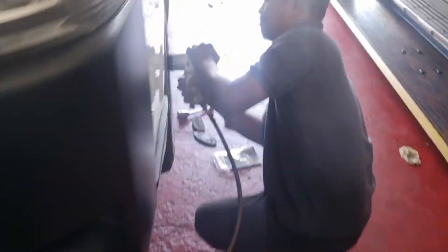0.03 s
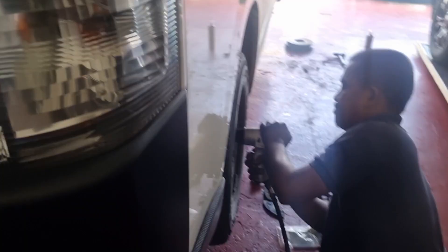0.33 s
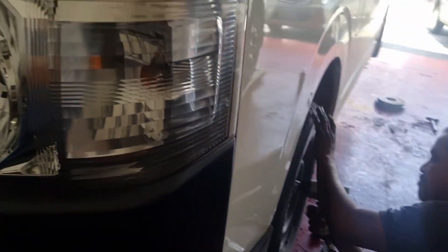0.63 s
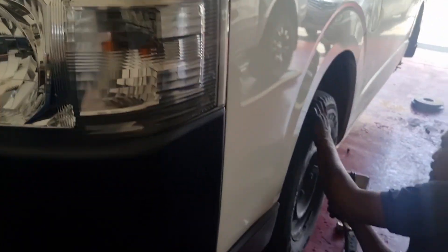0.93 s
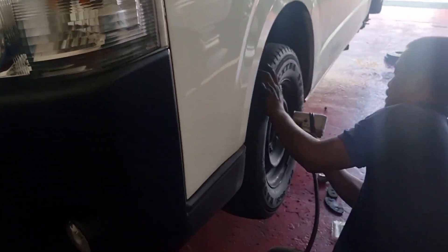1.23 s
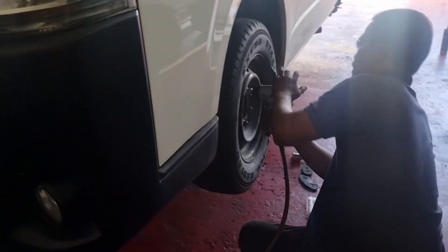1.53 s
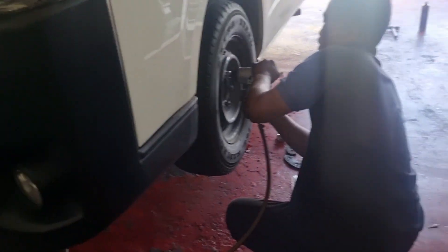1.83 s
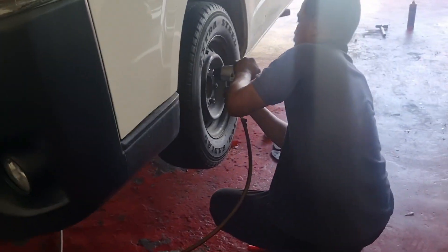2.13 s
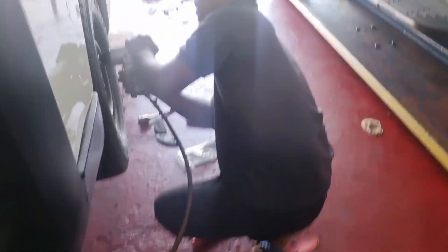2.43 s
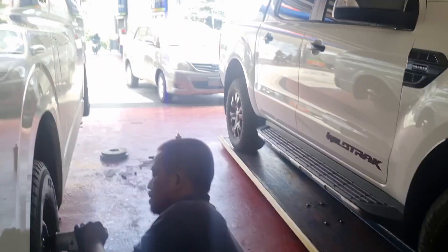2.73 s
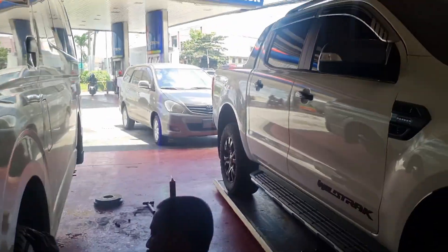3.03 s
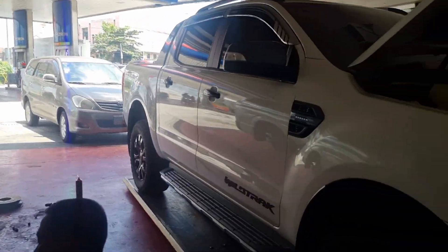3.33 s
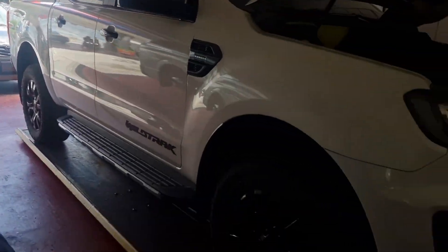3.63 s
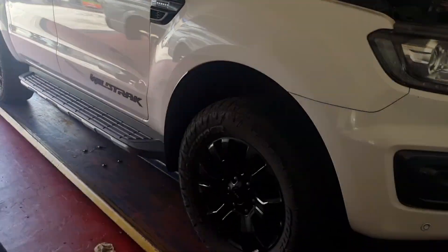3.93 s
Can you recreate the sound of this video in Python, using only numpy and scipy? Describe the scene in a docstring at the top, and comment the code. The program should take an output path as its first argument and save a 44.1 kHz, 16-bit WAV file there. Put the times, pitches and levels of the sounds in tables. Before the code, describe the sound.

An air impact wrench rattles and hisses in three bursts in an echoing garage.

```python
"""An air impact wrench runs three times on the wheel nuts of a van in an open, echoing garage.
Its hammer strikes about sixteen times a second and rings socket and wheel; the exhaust air hisses
and whistles, the motor drones. Between bursts the socket clanks onto the next nut.
Traffic and an idling engine rumble outside."""
import sys
import numpy as np
from scipy import signal
from scipy.fft import rfft, irfft
from scipy.io import wavfile
from scipy.ndimage import uniform_filter1d, map_coordinates

SR = 44100
rng = np.random.default_rng(int(sys.argv[2]) if len(sys.argv) > 2 else 0)


def wav_record(signal):
    """Record a signal, one row per channel, as 16-bit PCM in the file named by sys.argv[1]."""
    frames = np.transpose(np.atleast_2d(signal))
    bounded = np.clip(frames, -1, 1)
    # unit amplitude maps onto the largest positive 16-bit level
    quanta = np.round(bounded * 32767).astype(np.int16)
    wavfile.write(sys.argv[1], SR, quanta)


N = 176400
TIME_S = np.arange(N) / SR

# trigger held: start_s, stop_s, air_gain_db, mid_gain_db, high_whistle_gain_db, motor_hz, drone_db
BURSTS = [(-.5, .468, 1, -2.5, -12, 175.2, -31), (1.416, 2.825, -1.5, -0.16, 3, 184.7, -30),
          (3.454, 4.2, 0.5, 1.6, 12.5, 186, -25.5)]
# hammer blows: time_s, level_db
BLOWS = [(0.0395, 4.5), (0.1035, -3), (0.1646, 4.5), (0.227, 2.5), (0.2877, 2), (0.348, 2), (.403, 4.5),
         (.46, 0), (0.5502, -2), (1.481, 8), (1.5176, 2.5), (1.5806, 1), (1.6406, 1), (1.7029, 1.5),
         (1.7664, 1.5), (1.825, 0.5), (1.8896, 0.5), (1.9533, 0.5), (2.0177, 2), (2.0812, 3.5), (2.1458, 4),
         (2.2042, 2.5), (2.2712, 1.5), (2.3294, -11), (2.365, 2.5), (2.4362, 2.5), (2.5053, 2),
         (2.562, 1.5), (2.6741, 2), (2.7808, 2), (2.8214, -3), (3.521, 3), (3.5752, 0.5), (3.6348, -0.5),
         (3.6939, -4), (3.7514, -1.5), (3.8108, -0.5), (3.8652, 0), (3.938, -2.5)]
SPIN_UP_S, STALL_S, PRESSURE_DECAY_S = 0.025, 0.0176, 0.022


def hammer(crack_db=-16.5, crack_s=0.0015, clatter_db=-24, clatter_s=0.019, ring_db=5):
    """Each blow cracks, clatters and rings wheel, socket and nut, a little differently each time."""
    # contact spectrum: freq_hz, gain_db
    spectrum = [(150, -13), (720, -0.5), (1200, 3), (1550, 2), (2400, 1.5), (5200, -0.5), (8000, -2),
                (10000, -7.5), (15000, -8.5)]
    # wheel, socket and nut modes: freq_hz, gain_db, t60_s
    modes = [(344, -31, 0.055), (853, -15, 0.0034), (1223, -15, 0.013), (1334, -27.5, 0.095),
             (2300, -12, 0.0034)]
    # how freely the socket rings: time_s, gain_db
    ring_gain = [(.2, -11), (1.5, -7.5), (1.6, 2), (2.2, -3.5), (2.4, -1.5), (2.8, -3.5), (3.55, -8.5),
                 (4, -2)]
    time_s, level_db = np.transpose(BLOWS)
    hits = clicks(time_s, level_db)
    contact = from_db(crack_db) * fade(hits, crack_s) + from_db(clatter_db) * fade(hits, clatter_s)
    ringing = 0
    for k, (freq_hz, gain_db, t60_s) in enumerate(modes):
        strikes = clicks(time_s, level_db + gain_db + rng.normal(0, 1, len(time_s)))
        ringing += (-1) ** k * ring(strikes, freq_hz, t60_s)
    ringing *= from_db(ring_db + curve(ring_gain))
    return colour(contact * rng.standard_normal(N), spectrum) + ringing


def exhaust(level_db=-21.5, dip_db=-0.5, flutter_db=1.37, fill_s=0.022):
    """Fluttering air from the motor: starts thin, fills in, dips slightly at each blow."""
    # hiss spectrum: freq_hz, gain_db
    spectrum = [(60, -9), (125, 0.5), (205, 1), (265, -3), (340, -0.5), (660, -4), (1250, -5.5),
                (1520, -6.5), (2000, -4), (2800, -1.5), (3500, -3.5), (6200, -4.5), (7200, 1), (8500, -7.5),
                (9700, -9), (12500, -5.5), (16000, -5.5)]
    # hiss treble: time_s, gain_db
    treble_gain = [(0, -3.5), (1.5, 3), (2.2, -3), (2.4, 1), (2.8, -0.5), (3.5, -0.5), (4, -3.5)]
    # resonance pulsing with the blows: time_s, level_db
    shrill_level = [(.1, -28), (.44, -26), (.7, -33), (2.7, -45), (4, -30)]
    # resonance in the hiss: time_s, level_db
    bright_level = [(2.2, -50), (2.7, -39.5), (3.5, -49)]
    flow = from_db(dip_db * after_blows(STALL_S) + flutter_db * drift(78))
    hiss = from_db(level_db) * colour(rng.standard_normal(N) * flow, spectrum)
    mids = signal.sosfilt(signal.butter(1, [280, 3500], "band", fs=SR, output="sos"), hiss)
    treble = signal.sosfilt(signal.butter(1, 7000, "high", fs=SR, output="sos"), hiss)
    hiss += (from_db(curve(treble_gain)) - 1) * treble
    shrill = unit_rms(ring(rng.standard_normal(N), freq_hz=3040, t60_s=0.0053))
    shrill *= from_db(curve(shrill_level)) * after_blows(PRESSURE_DECAY_S)
    bright = from_db(curve(bright_level)) * unit_rms(ring(treble, freq_hz=5080, t60_s=0.0019))
    out = 0
    for start_s, stop_s, air_gain_db, mid_gain_db, *_ in BURSTS:
        filled = 1 - np.exp(-np.maximum(TIME_S - start_s, 0) / fill_s)
        air = from_db(air_gain_db) * (hiss + (filled * from_db(mid_gain_db) - 1) * mids)
        out += valve(start_s, stop_s) * (air + shrill + bright)
    return out


def whistles(flip_pressure=0.55, surge_db=0.5):
    """Pressure rises at each blow: the low whistle flips between two notes, the high one jumps and sinks."""
    # exhaust whistles, low then high: pitch_hz, jump_hz, wander_hz, width_hz, base_db
    voices = [(7070, 610, 70, 82, -30.5), (13400, 1300, 57, 48, -42.5)]
    # low whistle: time_s, gain_db
    low_gain = [(.07, 4), (.3, -9), (1.7, 5.5), (1.95, -2.5), (2.6, -8), (4, -4.5)]
    pressure, tones = after_blows(PRESSURE_DECAY_S), []
    flipped = pressure + 0.2 * drift(20) > flip_pressure
    for rise, (pitch_hz, jump_hz, wander_hz, width_hz, base_db) in zip((flipped, pressure), voices):
        phase = phase_of(pitch_hz + jump_hz * rise + wander_hz * drift(12.2))
        gain = from_db(base_db + surge_db * pressure + 2 * drift(11))
        narrow_noise = drift(width_hz) * np.sin(phase) + drift(width_hz) * np.cos(phase)
        tones.append(gain * unit_rms(narrow_noise))
    low, high = tones
    low *= from_db(curve(low_gain))
    return sum(valve(start_s + SPIN_UP_S, stop_s) * (low + from_db(high_gain_db) * high)
               for start_s, stop_s, _, _, high_gain_db, _, _ in BURSTS)


def motor(sag=0.08, wander=0.03478):
    """The rotor drones at twice and three times its speed; each blow slows it briefly."""
    stall, out = after_blows(STALL_S), 0
    speed = 1 - sag * (stall - stall.mean()) + wander * drift(41.8)
    for start_s, stop_s, *_, motor_hz, drone_db in BURSTS:
        phase = phase_of(motor_hz * speed)
        drone = sum(from_db(gain_db + 2 * drift(26)) * np.sin(order * phase)
                    for order, gain_db in ((2, -4), (3, -8.5)))
        out += valve(start_s + SPIN_UP_S, stop_s) * from_db(drone_db) * unit_rms(drone)
    return out


def valve(start_s, stop_s, open_s=0.0082, close_s=0.022):
    """Trigger valve opening, 0 to 1."""
    return np.clip((TIME_S - start_s) / open_s, 0, 1) * np.clip(1 - (TIME_S - stop_s) / close_s, 0, 1)


def after_blows(decay_s):
    """1 at each blow, sinking towards 0."""
    return np.minimum(fade(clicks(np.transpose(BLOWS)[0], 0), decay_s), 1)


def socket(knock_db=-28, knock_s=0.0042, slide_db=-30.5, slide_s=0.051):
    """The socket knocks against the nut, then scrapes on."""
    # socket meets nut: time_s, level_db
    clanks = [(1.069, -5.5), (1.351, -8), (3.2317, -0.5), (3.3194, -11.5)]
    # clank spectrum: freq_hz, gain_db
    spectrum = [(100, 3), (350, 10), (700, 1), (1600, 0.5), (2900, 3.5), (5500, -10), (7300, -2.5),
                (9000, -17), (15000, -16)]
    hits = clicks(*np.transpose(clanks))
    knock = from_db(knock_db) * fade(hits, knock_s)
    slide = from_db(slide_db + drift(90)) * fade(hits, slide_s)
    return colour((knock + slide) * rng.standard_normal(N), spectrum)


def garage(direct, into_hall, direct_db=-4, spots=20):
    """Direct sound on two spaced microphones, plus echoes that change as the listener walks about."""
    # direct sound at the right microphone: time_s, lag_ms
    right_lag = [(0, 0.13), (2.7, 0.322), (3.6, 0.54)]
    lead = SR // 3
    running = np.r_[into_hall[:lead][::-1], into_hall]  # the hall starts full of sound
    position, echoes = np.linspace(0, spots - 1, len(running)), 0
    noise = np.hstack([diffuse() for _ in range(spots * SR // N + 1)])
    for k in range(spots):
        nearness = np.sqrt(np.clip(1 - abs(position - k), 0, 1))
        response = reflections(noise[:, k * SR:(k + 1) * SR])
        echoes += signal.fftconvolve([running * nearness], response, axes=1)[:, lead:lead + N]
    right = map_coordinates(direct, [np.arange(N) - curve(right_lag) * SR / 1000], order=3)
    return from_db(direct_db) * np.array([direct, right]) + echoes


def reflections(noise, early_db=4, early_s=0.0035, tail_db=1.5):
    """Response at one spot: quick echoes off van and floor, then the hall's tail."""
    # hall decay: freq_hz, t60_s
    bands = [(100, 0.72), (500, 1.09), (2500, 0.88), (7000, 0.82), (10000, 0.57)]
    freq_hz, time_s = np.fft.rfftfreq(SR, 1 / SR), TIME_S[:SR]
    spectrum, response = rfft(noise), 0
    early = from_db(early_db) * unit_rms(np.exp(-time_s / early_s))
    for band_hz, t60_s in bands:
        share = at_hz([(hz, hz == band_hz) for hz, _ in bands], freq_hz)
        tail = from_db(tail_db) * unit_rms(np.exp(-np.log(1000) * time_s / t60_s))
        response += irfft(spectrum * share, SR) * np.hypot(tail, early)
    return flatten(response) / np.sqrt(SR)


def flatten(response, smooth_hz=24, length_s=0.8):
    """Echoes from many surfaces add up to an even colour."""
    spectrum = rfft(response)
    power = uniform_filter1d(abs(spectrum) ** 2, smooth_hz, axis=-1)
    return irfft(spectrum * np.sqrt(power.mean() / power), SR)[:, :int(length_s * SR)]


def street(engine_hz=40.8, wander=0.0448):
    """Traffic rumble and an idling engine."""
    # traffic spectrum: freq_hz, gain_db
    spectrum = [(25, -6), (46, -5.5), (62, -3.5), (85, -5), (120, -2.5), (180, -8.5), (280, -16.5),
                (520, -17), (1250, -20.5), (2000, -27.5), (9500, -38.5), (15000, -33)]
    # traffic: time_s, level_db
    traffic_level = [(0, -35), (1.4, -31), (3.35, -31), (4, -28)]
    # idling engine: time_s, level_db
    engine_level = [(0, -49), (1.3, -35.5), (2.5, -36), (3.0, -32.5), (3.3, -45), (3.9, -28.5)]
    phase = phase_of(engine_hz * (1 + wander * drift(5.5)))
    engine = sum(from_db(gain_db + 3.3 * drift(10)) * np.sin(order * phase)
                 for order, gain_db in ((1, -5), (2, 3)))
    traffic = unit_rms(colour(diffuse(), spectrum))
    return from_db(curve(traffic_level)) * traffic + from_db(curve(engine_level)) * unit_rms(engine)


def diffuse():
    """Stereo noise from all sides: alike in the bass, unrelated in the treble."""
    # left-right likeness: freq_hz, correlation
    likeness = [(60, 0.72), (160, 0.94), (330, 0.71), (600, -0.15), (1200, -0.43), (2500, -0.038),
                (16000, 0.085)]
    correlation = at_hz(likeness, np.fft.rfftfreq(N, 1 / SR))
    mid, side = rfft(rng.standard_normal((2, N)))
    spectra = np.sqrt(1 + correlation) * mid + np.sqrt(1 - correlation) * side * [[1], [-1]]
    return unit_rms(irfft(spectra, N))


def from_db(db):
    return 10 ** (np.asarray(db) / 20)


def unit_rms(x):
    return x / np.sqrt(np.mean(x ** 2) + 1e-20)


def phase_of(freq_hz):
    return 2 * np.pi * np.cumsum(freq_hz) / SR


def curve(rows):
    """Table read at every sample."""
    return np.interp(TIME_S, *np.transpose(rows))


def at_hz(rows, freq_hz):
    """Table read on a log-frequency axis."""
    row_hz, values = np.transpose(rows)
    return np.interp(np.log(np.maximum(freq_hz, 1)), np.log(row_hz), values)


def colour(x, spectrum):
    """Minimum-phase filter; white noise keeps its power."""
    size = 2 * N
    gain = unit_rms(from_db(at_hz(spectrum, np.fft.rfftfreq(size, 1 / SR))))
    cepstrum = irfft(np.log(gain))[:N]
    cepstrum[1:] *= 2
    return irfft(rfft(x, size) * np.exp(rfft(cepstrum, size)))[..., :N]


def drift(rate_hz):
    """Slow random motion, unit rms."""
    freq_hz = np.fft.rfftfreq(N, 1 / SR)
    return unit_rms(irfft(rfft(rng.standard_normal(N)) / (1 + (freq_hz / rate_hz) ** 2), N))


def clicks(time_s, level_db):
    """One impulse per event."""
    out = np.zeros(N)
    np.add.at(out, (time_s * SR).astype(int), from_db(level_db))
    return out


def fade(hits, decay_s):
    """Exponential envelope after each impulse."""
    return signal.lfilter([1], [1, -np.exp(-1 / (decay_s * SR))], hits + 1e-18)


def ring(x, freq_hz, t60_s):
    """Resonator: a unit impulse starts a decaying unit sine."""
    radius, angle = np.exp(-np.log(1000) / (t60_s * SR)), 2 * np.pi * freq_hz / SR
    return signal.lfilter([0, np.sin(angle)], [1, -2 * radius * np.cos(angle), radius ** 2], x + 1e-18)


def scene():
    """The wrench in the garage, the street behind."""
    air, blows, drone, tones, clanks = exhaust(), hammer(), motor(), whistles(), socket()
    # the blows face the listener and reach the hall less than the air does
    into_hall = air + from_db(-1.5) * blows + from_db(-11.5) * drone + from_db(-3.5) * tones + clanks
    return garage(air + blows + drone + tones + clanks, into_hall) + street()


def record(dry, cutoff_hz=15800):
    """Clip at full scale, then low-pass steeply."""
    freq_hz = np.fft.rfftfreq(2 * N, 1 / SR)
    passband = np.clip((cutoff_hz - freq_hz) / 100 + 0.5, 0, 1)
    return irfft(rfft(np.clip(dry, -1, 1), 2 * N) * passband)[:, :N]


dry = scene()
out = record(dry)
wav_record(out)
```